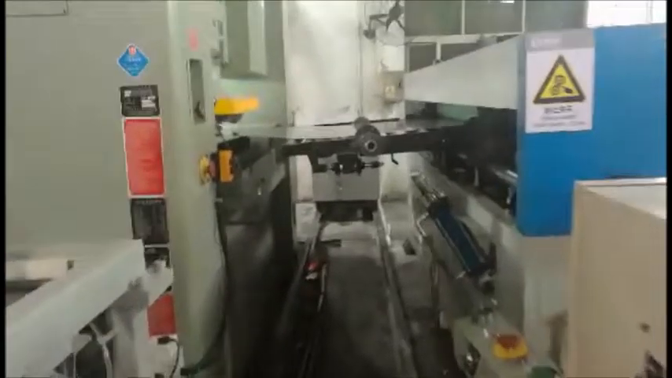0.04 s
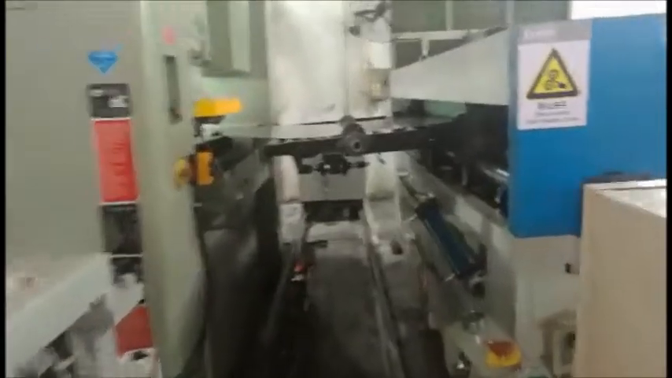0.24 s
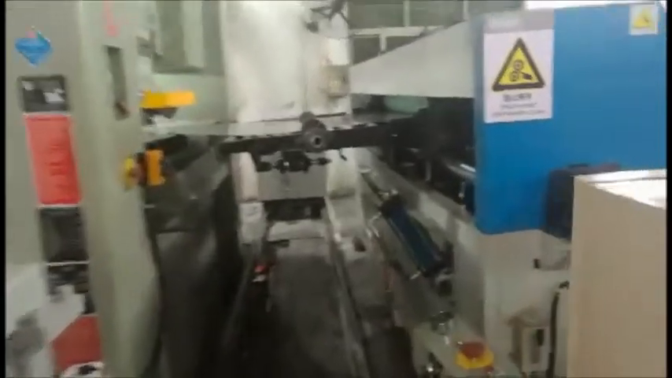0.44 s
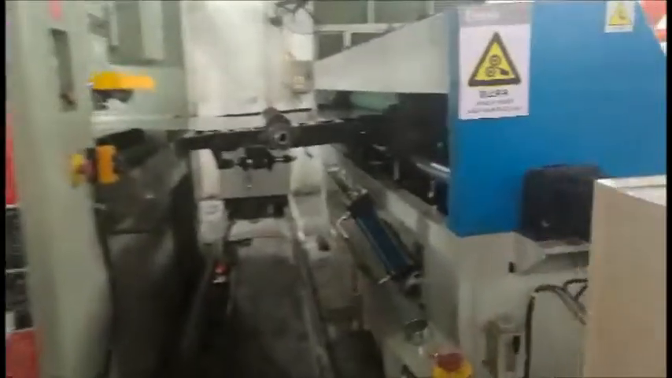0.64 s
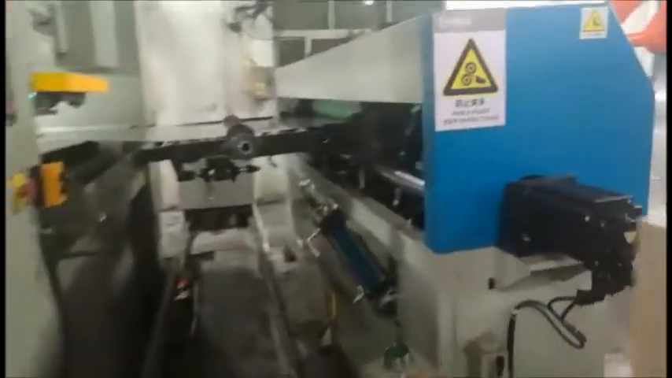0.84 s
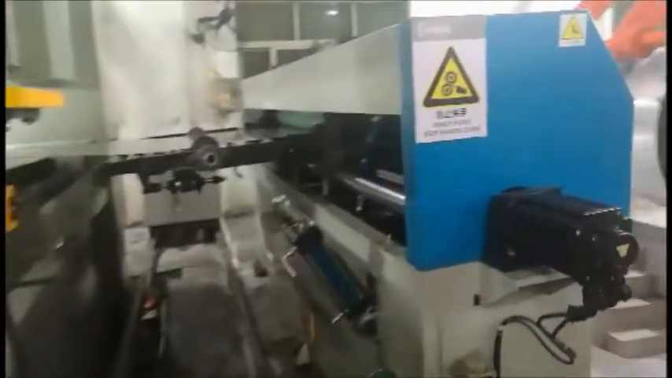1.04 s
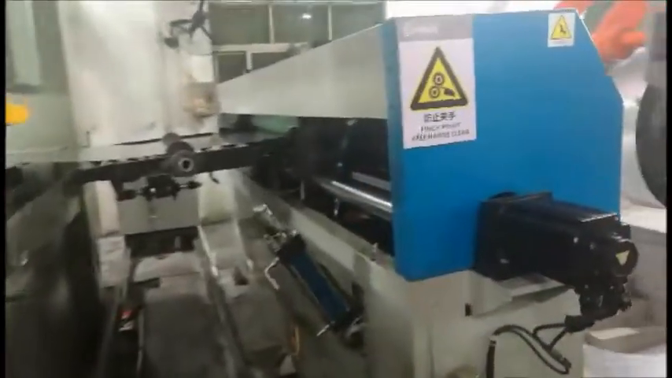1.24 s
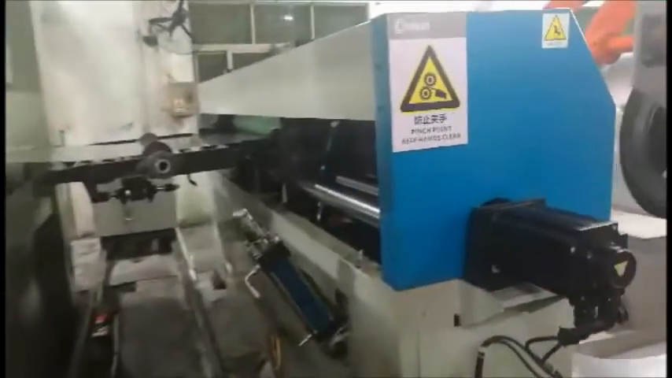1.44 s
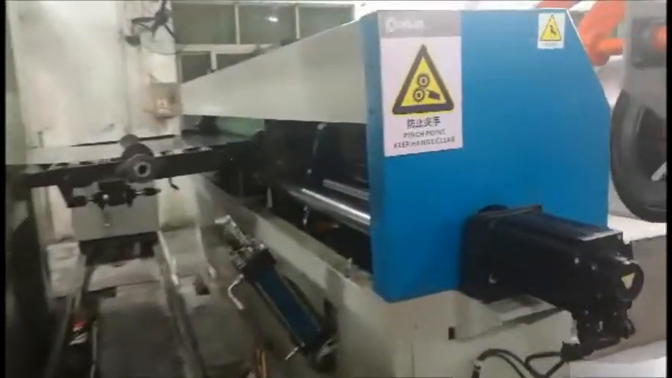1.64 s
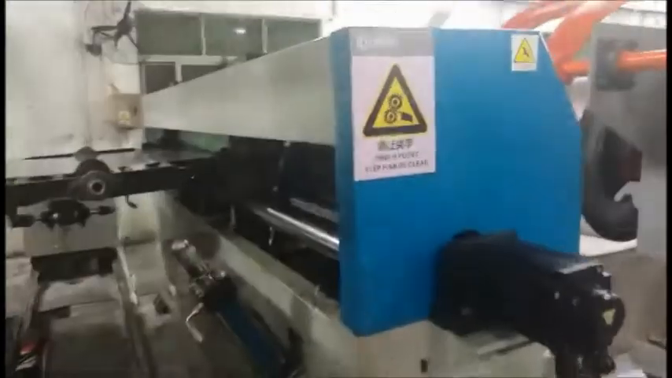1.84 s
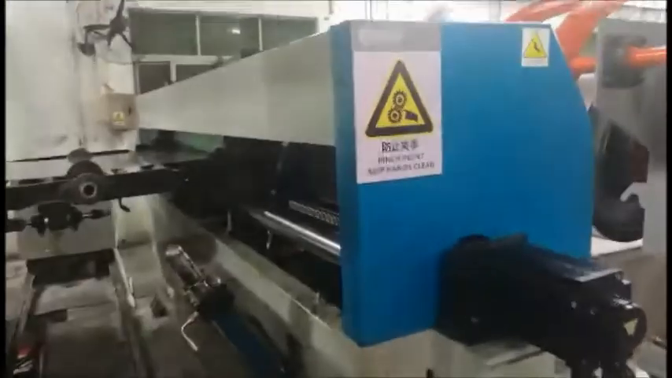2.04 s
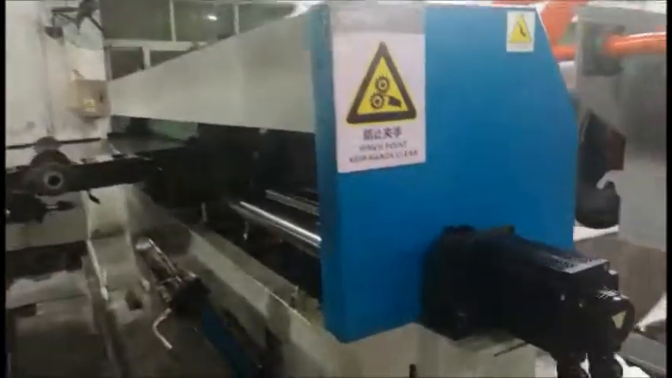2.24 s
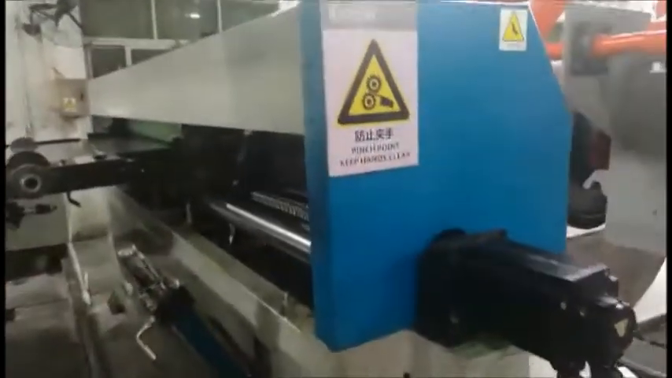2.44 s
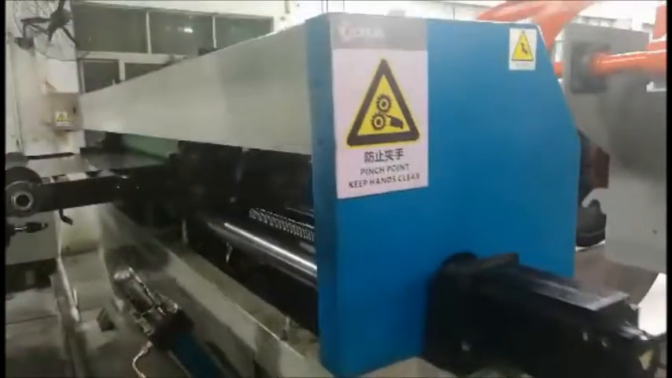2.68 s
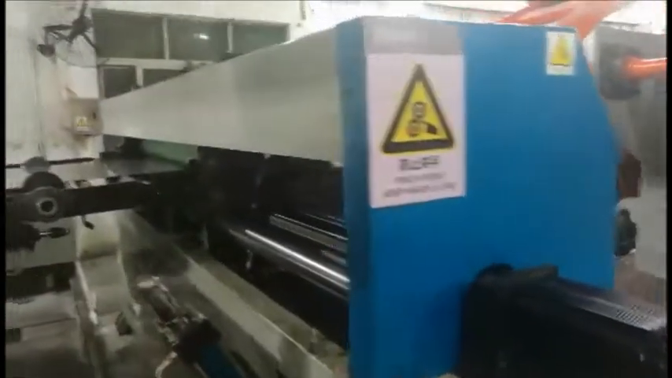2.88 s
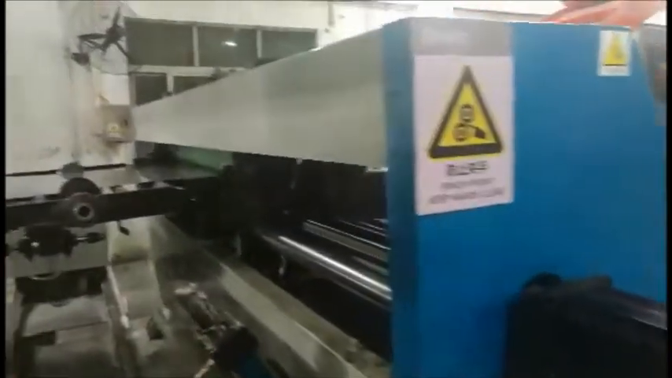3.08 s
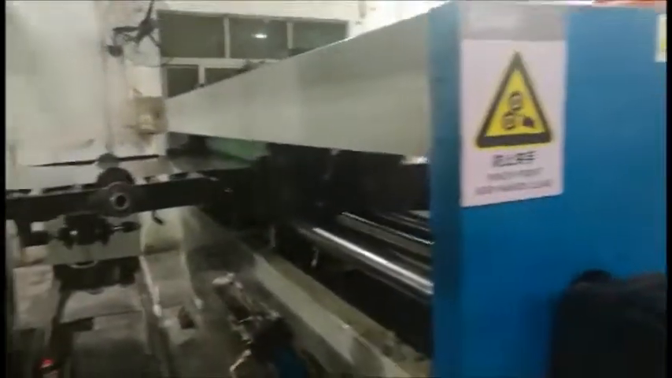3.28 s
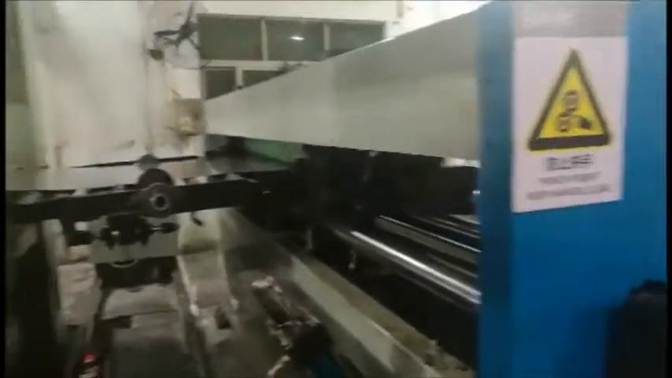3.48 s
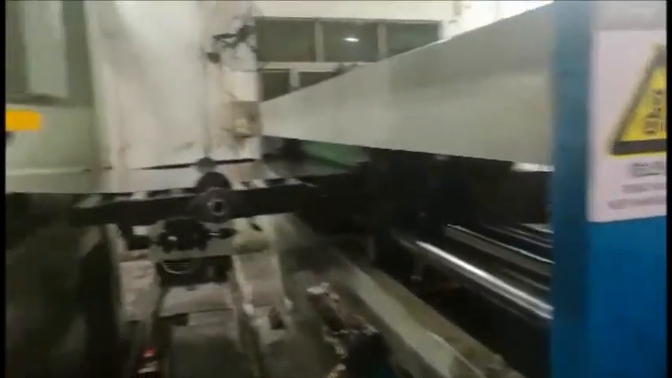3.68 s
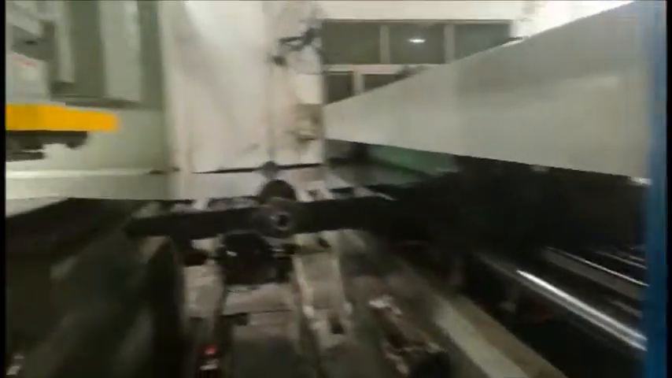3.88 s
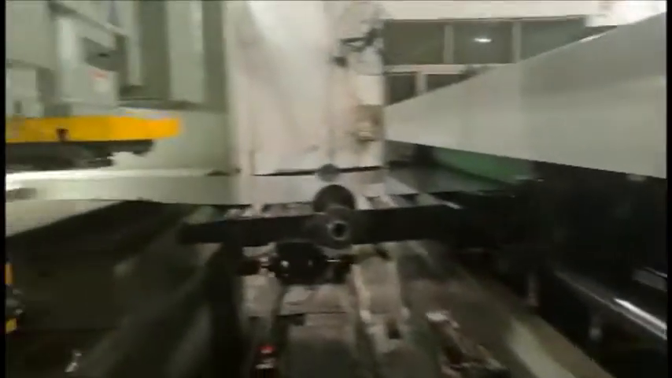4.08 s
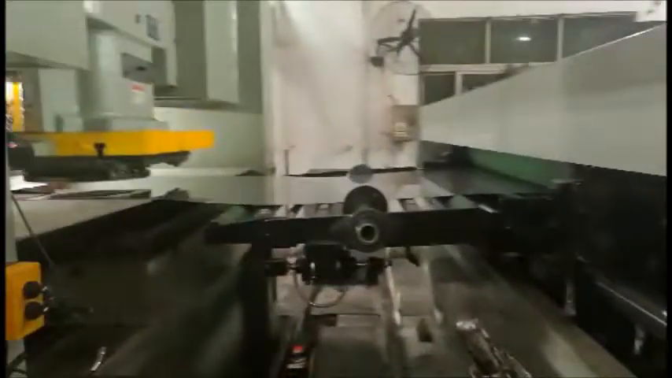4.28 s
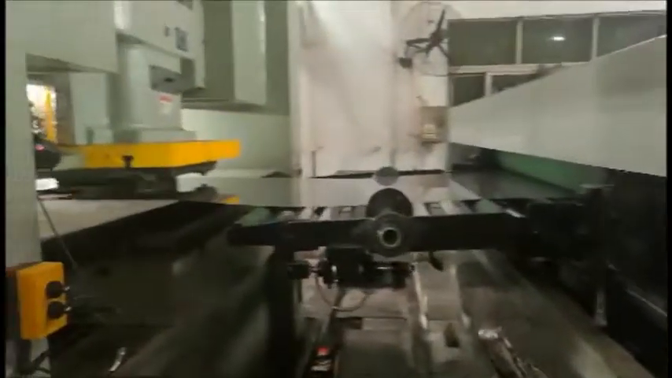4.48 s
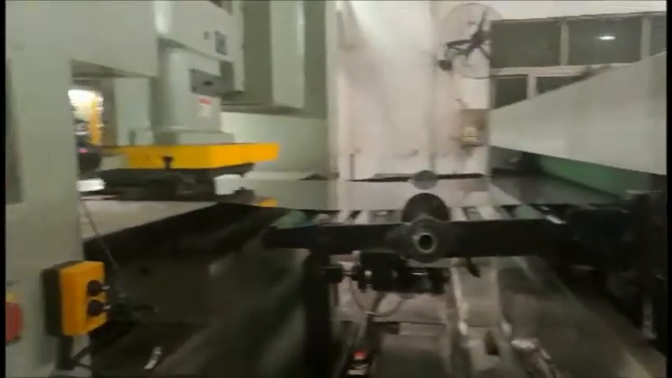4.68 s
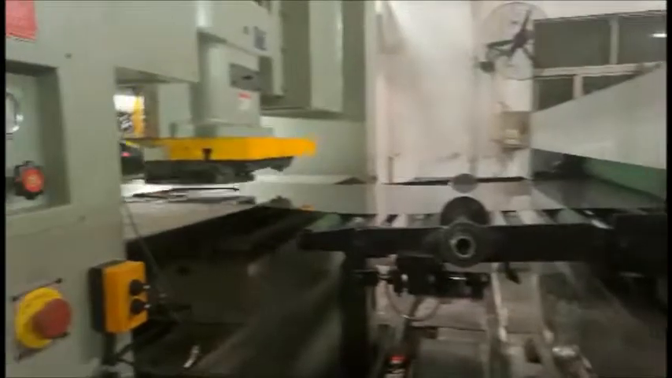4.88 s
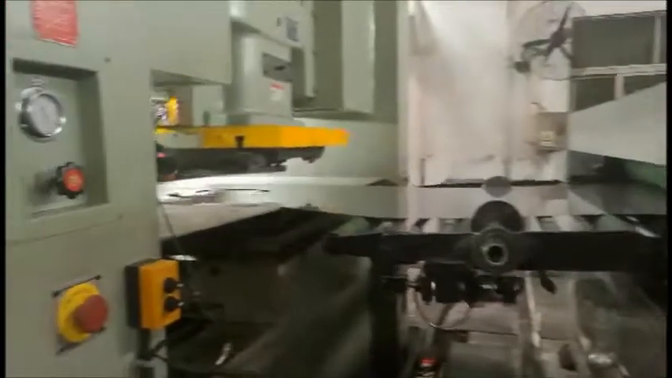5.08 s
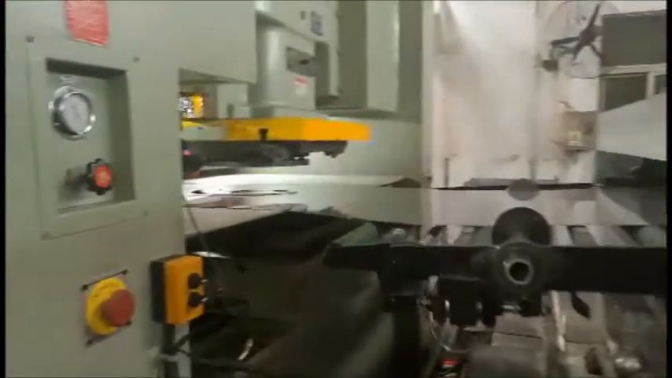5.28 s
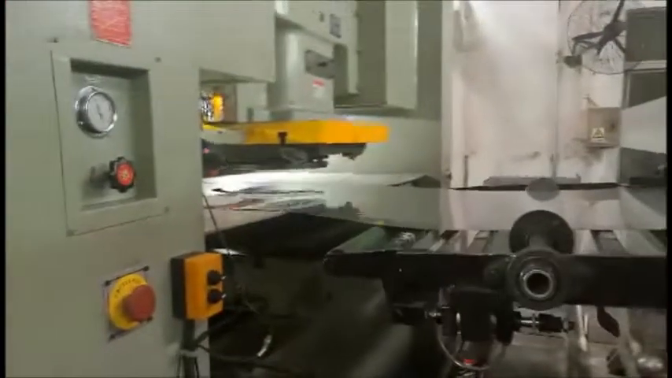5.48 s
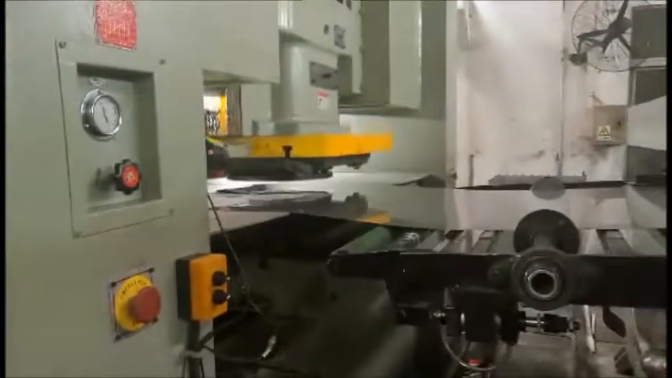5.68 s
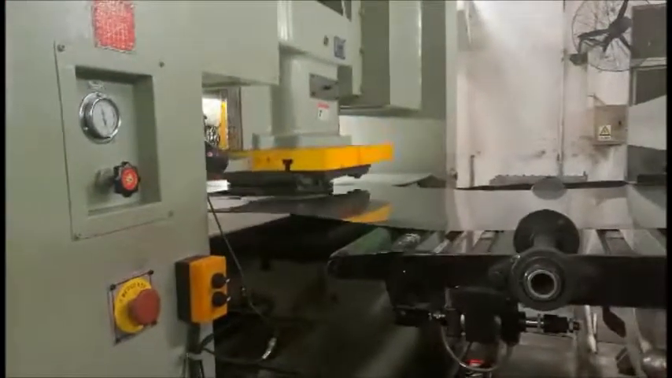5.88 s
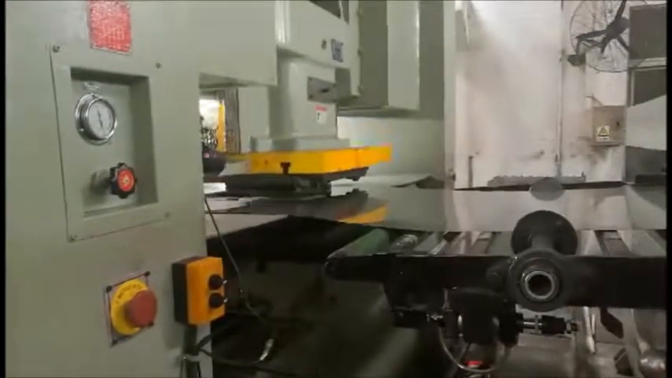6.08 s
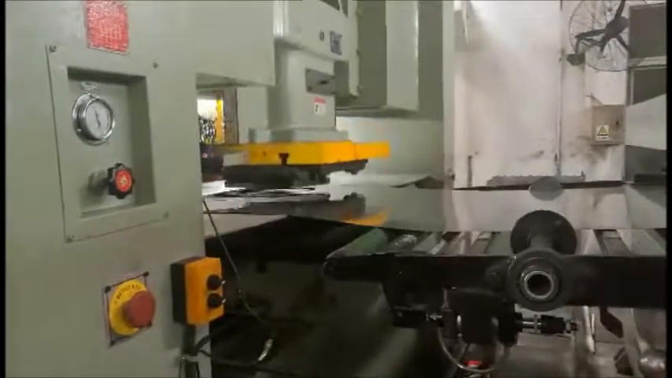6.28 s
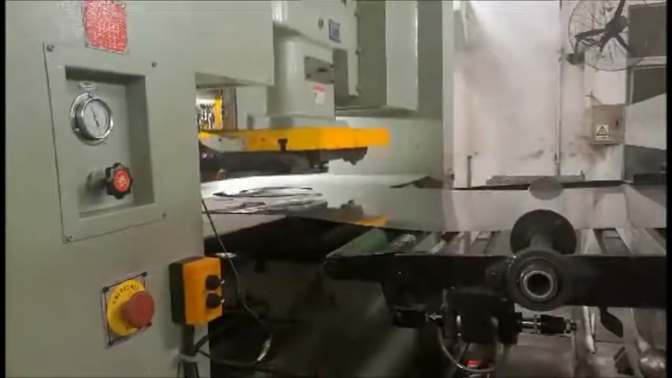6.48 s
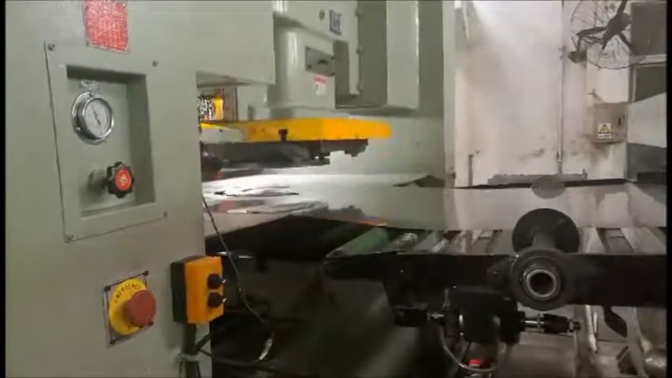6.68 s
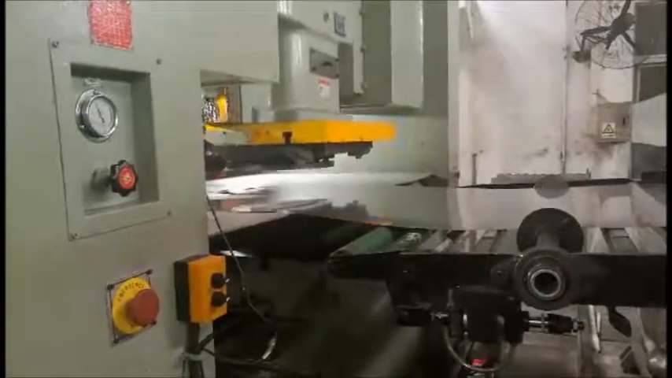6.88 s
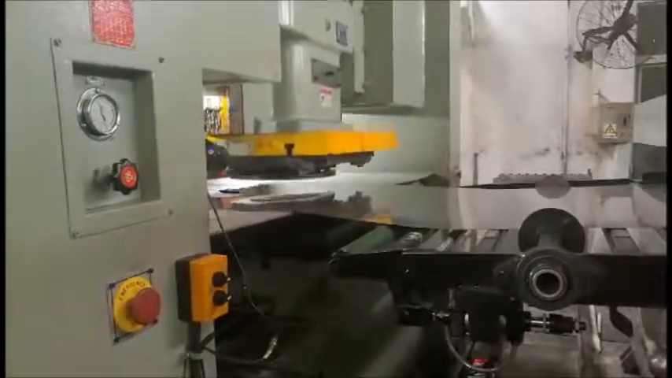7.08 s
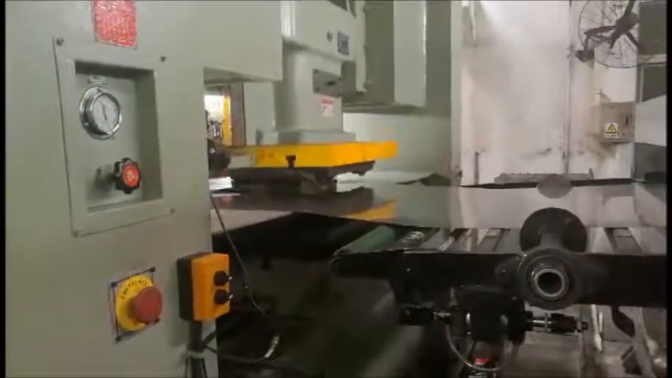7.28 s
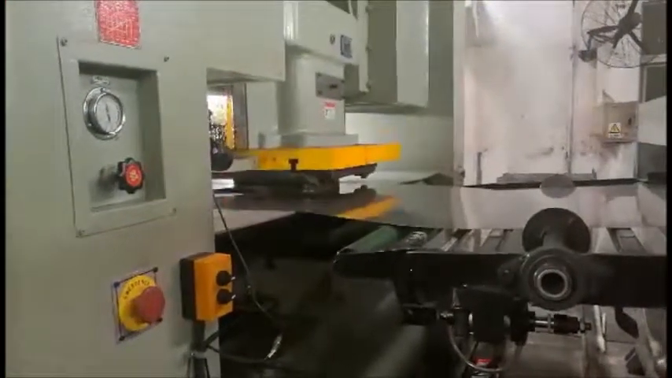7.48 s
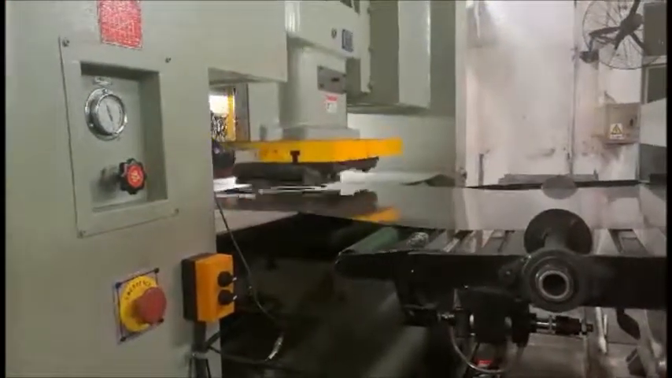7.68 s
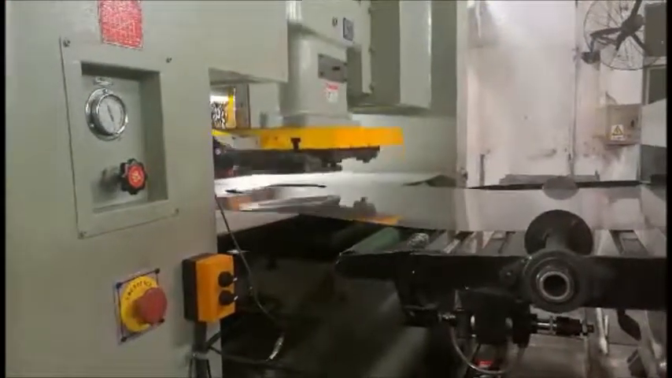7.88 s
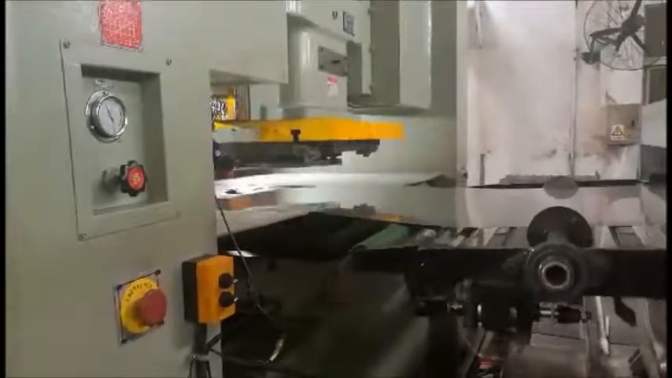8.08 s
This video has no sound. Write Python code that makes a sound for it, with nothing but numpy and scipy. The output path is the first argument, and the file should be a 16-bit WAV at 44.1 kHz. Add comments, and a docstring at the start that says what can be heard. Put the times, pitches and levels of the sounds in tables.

```python
"""A factory hall hums and hisses, something knocks far off and a valve spits air; then a power press strikes.
It punches sheet metal every 1.45 s: each stroke is a gritty clash, low thumps, ringing steel and a hall wash.
Between strokes valves spit, the strip scrapes, rollers tick and the far machine knocks once more.
A low tone follows the first stroke and comes back faintly later.
Noise shaped by frequency makes the rushes, clashes and hall; fading sine waves make the ringing and low tones."""
import sys
import numpy as np
from scipy import signal
from scipy.fft import rfft, irfft
from scipy.io import wavfile
from scipy.ndimage import uniform_filter1d

SR = 44100
rng = np.random.default_rng(int(sys.argv[2]) if len(sys.argv) > 2 else 0)


def output_pcm(signal):
    """Save a mono or channel-first signal as 16-bit PCM at the path in sys.argv[1].

    Samples are clipped to [-1, 1] before scaling.
    """
    pcm = np.clip(np.atleast_2d(signal).T, -1, 1) * 32767
    wavfile.write(sys.argv[1], SR, np.round(pcm).astype(np.int16))


N = 358533

# how alike the two microphones hear a sound: pitch_hz, correlation (-1 to 1)
MIC_LIKENESS = [(60, 0.98), (140, 1), (220, 0.87), (330, 0.84), (520, -0.14), (800, -0.19), (1200, 0.1),
                (3000, -0.0048)]
# first contact of the punch, and one turn of the crank
FIRST_STROKE_S, CYCLE_S = 0.2853, 1.452


def gain_of(db):
    """Turns decibels into a factor for the wave."""
    return 10 ** (np.asarray(db) / 20)


def read(points, hz, axis=1):
    """Reads one column of a table by straight lines over log frequency."""
    table = np.transpose(points)
    return np.interp(np.log(hz + 1), np.log(table[0] + 1), table[axis])


def add(mix, start_s, sound):
    """Mixes a stereo sound in at start_s, cutting off what runs past the end."""
    part = mix[:, max(round(start_s * SR), 0):][:, :sound.shape[1]]
    part += sound[:, :part.shape[1]]


def rise(t, seconds):
    """A smooth step from 0 to 1 that begins at t = 0."""
    return np.sin(np.pi / 2 * np.clip(t / max(seconds, 1e-4), 0, 1)) ** 2


def diffuse(table, count, hold=0, dying=True, ripple_db=0, patchy_db=3.0, size=1024):
    """Uneven stereo noise shaped by a table; if dying, each band fades at its own rate after hold seconds."""
    hz = np.fft.rfftfreq(size, 1 / SR)
    t = np.arange(count * 4 // size + 6)[:, None] * size / 4 / SR  # four overlapping frames per window
    a, b, c, d, patches = rng.standard_normal((5, len(t), len(hz)))
    # the second microphone hears a share of the first one's noise and some of its own
    same = read(MIC_LIKENESS, hz)
    first = a + 1j * b
    second = same * first + np.sqrt(1 - same ** 2) * (c + 1j * d)
    spectrum = np.array([first, second])
    # lasting peaks and dips, then random patches of louder and softer noise that come and go
    ripple = uniform_filter1d(rng.standard_normal((2, 1, len(hz))), size=2) * np.sqrt(2)
    patches = uniform_filter1d(uniform_filter1d(patches, size=8, axis=0), size=3, axis=1)
    unevenness_db = ripple_db * ripple + patchy_db * patches / patches.std()
    level_db = read(table, hz) + unevenness_db * hz / (hz + 500)  # the bass stays more even
    if dying:
        level_db = level_db - 60 * np.maximum(t - hold, 0) / read(table, hz, axis=2)
    spectrum *= gain_of(level_db) * np.sqrt(1.5 * SR / size)
    return signal.istft(spectrum.transpose(0, 2, 1), nperseg=size, noverlap=size * 3 // 4)[1][:, :count]


def gritty(sound, depth_db, size):
    """Breaks a sound into grains of about size samples by shaking its level."""
    grain = uniform_filter1d(rng.standard_normal(sound.shape[1]), size) * np.sqrt(size)
    gain = gain_of(depth_db * np.clip(grain, -2, 2))
    return sound * gain / np.sqrt(np.mean(gain ** 2))


def brighten(sound, db, corner_hz):
    """Gradually raises or lowers everything above a corner."""
    hz = np.fft.rfftfreq(sound.shape[1], 1 / SR)
    shelf = gain_of(db * hz ** 2 / (hz ** 2 + corner_hz ** 2))
    return irfft(rfft(sound) * shelf, sound.shape[1])


def burst(table, attack, hold, ripple_db=2):
    """A half-second rush that swells while its bands wait for hold seconds and then fade."""
    swell = rise(np.arange(SR // 2) / SR, attack)
    return diffuse(table, SR // 2, hold, ripple_db=ripple_db, size=512) * swell


def background():
    """The din of motors and fans, and leaking air whose hiss swells twice in every turn of the crank."""
    # motors and fans: pitch_hz, level_db per Hz
    din_bands = [(20, -97), (44, -73.5), (60, -87), (85, -68.5), (105, -77.5), (150, -71.5), (300, -68.5),
                 (480, -75.5), (800, -72), (1300, -79), (2200, -78.5), (3500, -81.5), (5000, -85.5),
                 (8000, -98.5)]
    # leaking air, before its swells: pitch_hz, relative_db per Hz
    leak_bands = [(2000, -105), (5000, -87.5), (7000, -91), (11500, -89.5), (14500, -91.5)]
    # swells of the leak in each turn: after_contact_s, change_db
    leak_cycle = [(.02, 5.5), (.36, 2.5), (.63, 0), (.84, 3), (1.17, -0.6)]
    # slow drift of the leak: time_s, change_db
    leak_drift = [(0, 0.5), (2.7, -1.5), (3.9, 1.7), (5.3, 1.5), (6.4, 0), (8.1, -0.5)]
    t = np.arange(N) / SR
    leak_db = np.interp(t - FIRST_STROKE_S, *np.transpose(leak_cycle), period=CYCLE_S)
    leak_db += np.interp(t, *np.transpose(leak_drift))
    din = diffuse(din_bands, N, dying=False, ripple_db=0.0, patchy_db=2.5, size=4096)
    din = gritty(din, depth_db=0.2, size=2500)
    return din + gain_of(leak_db) * diffuse(leak_bands, N, dying=False)


def neighbour():
    """A machine across the hall: blunt, mostly low bursts of noise that swell and fade."""
    # its knocks: start_s, level_db, swell_s
    knocks = [(.022, 2, 0.045), (4.37, 4.5, 0.034)]
    # sound of a knock: pitch_hz, relative_db per Hz, time to fade by 60 dB in s
    far_bands = [(22, -78, .7), (50, -67, .7), (150, -62, 0.93), (500, -65.5, 1), (935, -62.5, 0.78),
                 (1550, -69.5, 0.58), (4000, -79.5, 0.95), (7000, -88, 0.3), (14000, -91, 0.27)]
    out = np.zeros((2, N))
    for start_s, level_db, swell_s in knocks:
        add(out, start_s, gain_of(level_db) * burst(far_bands, attack=swell_s, hold=0.045))
    return out


def valves():
    """Compressed air rushes out as a short hiss with a thin whistle on top, and the hall washes it out."""
    # puffs of air: start_s, level_db, treble_db, whistle_db
    spits = [(0.193, 2, 0.5, -14), (0.456, 6, -0.5, -12), (1.911, -6, 2.5, -20), (2.144, 1, -4, -7),
             (3.056, -7, -3.5, -15), (4.282, -5.5, 2, -10), (4.376, -5.5, -8, -15), (4.560, 0.5, -4.5, -4),
             (5.911, -6, 5.5, -6), (7.317, -7, 6.5, -22)]
    # rushing air: pitch_hz, relative_db per Hz, time to fade by 60 dB in s
    jet_bands = [(200, -83, .4), (1500, -73, 1), (3000, -73, 0.57), (4600, -68.5, 0.34),
                 (5740, -69.5, 0.29), (7650, -75.5, 0.37), (11100, -68.5, 0.29), (14500, -75, 0.24)]
    # thin top whistle: pitch_hz, relative_db per Hz, time to fade by 60 dB in s
    whistle_bands = [(11500, -105, .1), (12800, -62, .12), (13600, -58, 0.13), (15000, -71, .12)]
    hold_at_0_db_s, stretch = 0.013, 0.72  # stretch: dB of time gained per dB of level lost
    wash_db, wash_decay_s = -16, 0.19
    out, t = np.zeros((2, N)), np.arange(SR) / SR
    for start_s, level_db, treble_db, whistle_db in spits:
        # a valve that opens less hisses for longer
        hold = hold_at_0_db_s * gain_of(-stretch * level_db)
        jet = brighten(burst(jet_bands, 0.008, hold, ripple_db=4.5), treble_db, corner_hz=7000)
        whistle = gain_of(whistle_db) * burst(whistle_bands, attack=0.011, hold=hold)
        wash = diffuse(jet_bands, SR, dying=False) * rise(t, 0.033) * np.exp(-t / wash_decay_s)
        add(out, start_s, gain_of(level_db) * (jet + whistle))
        add(out, start_s, gain_of(level_db + wash_db) * wash)
    return out


def clash(lead):
    """The stages of one cut, each a gritty burst of steel on steel; contact comes lead seconds in."""
    # stripper clamps, punch lands, sheet cracks, punch snaps through:
    # after_contact_s, relative_db, treble_db, treble_corner_hz, attack_s
    stages = [(-.018, -5.5, -12.5, 1000, 0.014), (-.002, -3.5, 0, 8000, 0.0053),
              (.006, -3, -1, 7000, 0.0043), (.028, -2.2, -10.5, 2500, 0.0039)]
    # dense ring of die and sheet: pitch_hz, relative_db per Hz, time to fade by 60 dB in s
    clash_bands = [(25, -69, .4), (60, -52, 0.18), (105, -54, 0.17), (170, -41.5, 0.17), (452, -51, 0.67),
                   (910, -40.5, 0.25), (1480, -49, 0.48), (2840, -56, 0.34), (3700, -53.5, 0.2),
                   (6800, -67, 0.54), (12100, -65, 0.55), (14300, -67, 0.21)]
    out, t = np.zeros((2, SR // 2)), np.arange(SR // 2) / SR
    for after_s, level_db, treble_db, corner_hz, attack in stages:
        steel = diffuse(clash_bands, len(t), ripple_db=3.0, size=512)
        steel = gritty(steel, depth_db=1.5, size=70)
        steel = brighten(steel, treble_db, corner_hz) * rise(t, attack)
        add(out, lead + after_s, gain_of(level_db) * steel)
    return out


def ring(t, attack, split=0.01334, twin=0.71):
    """The modes of frame and die; each has a weaker twin close by, so that it beats as it dies."""
    # frame (low) and die (high): pitch_hz, relative_db, time to fade by 60 dB in s
    modes = [(55, -31, .9), (66, -36, 1.6), (97, -41, 1.5), (118, -26, .45), (135, -22.5, .45),
             (154, -28, 2.6), (173, -16, .35), (182, -24, 1.9), (221, -31, 1.8), (248, -24.5, 2.0),
             (283, -29, 1.3), (316, -20.5, 1.3), (345, -32, 1.6), (364, -24, 1.1), (394, -26, 1.4),
             (503, -30, 1.3), (560, -35, 1.8), (619, -24.5, .55), (834, -27, .7), (978, -20, .55),
             (1079, -30, .8), (1259, -27, .7), (1482, -28, .6), (1996, -32, .8), (3140, -42, 1.0),
             (4635, -35, .75), (5459, -44, 1.2), (6330, -47, 1.2), (7289, -47, 1.1), (8520, -41, .4)]
    out = np.zeros((2, len(t)))
    draws = rng.uniform(-1.057, 1, (len(modes), 4))
    for (hz, level_db, t60), (turn, beat_turn, side, gap) in zip(modes, draws):
        # a lag between the microphones gives the likeness wanted at this pitch
        lag = np.arccos(read(MIC_LIKENESS, hz)) * np.sign(side)
        beat_hz = np.sign(gap) * 4 + gap * split * min(hz, 3000)
        fade = gain_of(level_db) * np.exp(-np.log(1000) * t / t60)
        fade *= rise(t, attack + 1.4 / hz)  # heavy modes start slowly
        beating = 1 + twin * np.exp(2j * np.pi * (beat_hz * t + beat_turn))
        wave = np.exp(2j * np.pi * (hz * t + turn)) * beating
        out += (np.exp(1j * np.array([[0], [lag]])) * wave).real * fade
    return out


def hall(t):
    """The hall returns a long wash of noise whose bands die at their own rates."""
    # answer to a stroke: pitch_hz, relative_db per Hz, time to fade by 60 dB in s
    hall_bands = [(25.1, -75, 2), (60.5, -58, 2.5), (110, -53, 2.1), (171, -53.5, 3), (337, -48.5, 3.7),
                  (408, -55, 3.77), (890, -53.5, 3.05), (1360, -59, 3.22), (1990, -63.5, 3.14),
                  (3120, -67, 2), (5000, -67.5, 1.38), (7000, -77, 1.85), (13000, -71.5, 0.87)]
    return diffuse(hall_bands, len(t), ripple_db=5.0, size=2048) * rise(t, 0.061)


def thump(hz, width):
    """One heavy low push, a few waves under a bell shape, the same at both microphones."""
    t = np.arange(-SR // 20, SR // 20) / SR
    return np.tile(np.cos(2 * np.pi * hz * t) * np.exp(-(t / width) ** 2), (2, 1))


def repeated(usual, fresh):
    """A machine repeats itself: the bass is nearly the same every stroke, the treble mostly new."""
    # likeness to the usual stroke: pitch_hz, correlation (0 to 1)
    repeats = [(100, .98), (300, .97), (900, .92), (2500, .7), (6000, .4), (14000, .2)]
    same = read(repeats, np.fft.rfftfreq(usual.shape[1], 1 / SR))
    return irfft(same * rfft(usual) + np.sqrt(1 - same ** 2) * rfft(fresh), usual.shape[1])


def press():
    """The punch clashes through the sheet, the strained frame springs back and rings, the hall answers."""
    # one row a stroke: strength_db of the cut, openness of the die to the microphones (0 to 1), hall_db
    strokes = [(-4, 0.73, -2), (0, 0.24, .5), (-0.5, 0.54, -2), (.5, 1, -2), (1.5, 0.87, .5), (1.3, 1, -2)]
    # the released frame kicks the floor and rebounds: after_contact_s, pitch_hz, relative_db, half_width_s
    thumps = [(0.037, 68, -23, 0.014), (0.071, 67, -28, 0.01)]
    # screened by the feeder the frame's hum and the bite lead, in the open the die's clash does;
    # each pair: screened_db, open_db
    cut_pair, bite_pair, treble_pair = (-6, -0.24), (12.5, -0.9), (-3.5, 2.5)
    thump_pair, ring_pair, upper_modes_pair = (3, -2), (2, -4), (-8, 3.5)
    # a harder cut is brighter and kicks the floor harder (dB per dB of strength)
    treble_per_db, thump_per_db = 0.6, 3.5
    out, t = np.zeros((2, N)), np.arange(2 * SR) / SR
    lead = 0.03  # s of clash before contact
    usual_clash, usual_hall, modes = clash(lead), hall(t), ring(t, attack=0.012)
    pairs = [cut_pair, bite_pair, treble_pair, thump_pair, ring_pair, upper_modes_pair]
    screened, in_the_open = np.transpose(pairs)
    for turn, (strength_db, openness, hall_db) in enumerate(strokes):
        contact_s = FIRST_STROKE_S + turn * CYCLE_S
        levels_db = screened + openness * (in_the_open - screened)
        cut_db, bite_db, treble_db, thump_db, ring_db, upper_db = levels_db
        cut = brighten(repeated(usual_clash, clash(lead)), bite_db, corner_hz=1210)
        # the top takes back half of the bite's change
        top_db = treble_db + treble_per_db * strength_db - bite_db / 2
        cut = brighten(cut, top_db, corner_hz=4500)
        add(out, contact_s - lead, gain_of(cut_db + strength_db) * cut)
        add(out, contact_s + 0.00198, gain_of(ring_db) * brighten(modes, upper_db, corner_hz=280))
        add(out, contact_s + 0.01, gain_of(hall_db) * repeated(usual_hall, hall(t)))
        kick_db = thump_db + thump_per_db * strength_db
        for after_s, hz, level_db, width in thumps:
            # each thump peaks 1/20 s into its own sound
            add(out, contact_s + after_s - 1 / 20, gain_of(kick_db + level_db) * thump(hz, width))
    return out


def low_ring(swell=0.047):
    """A low tone, one sine wave, swells briefly and fades, once after the first stroke and once later."""
    # tones: start_s, pitch_hz, level_db, time to fade by 60 dB in s
    low_tones = [(.345, 319.7, -11.5, 0.49), (2.132, 344, -29.5, 0.89)]
    out, t = np.zeros((2, N)), np.arange(SR) / SR
    for start_s, hz, level_db, t60 in low_tones:
        tone = np.sin(2 * np.pi * hz * t) * np.exp(-np.log(1000) * t / t60) * rise(t, swell)
        add(out, start_s, gain_of(level_db) * np.tile(tone, (2, 1)))
    return out


def feeder():
    """The strip scrapes over its guides as grainy noise, and the rollers tick in short bright bursts."""
    # scrapes: start_s, level_db, swell_s
    scrapes = [(0.951, -11.5, 0.054), (1.025, -6.5, 0.038), (2.299, -10, 0.029), (3.33, -6.5, 0.035),
               (3.765, -6, 0.032), (3.81, -3.5, 0.03), (5.175, -6, 0.029), (5.225, -7, 0.015),
               (5.37, -11.5, 0.015), (6.638, -8, 0.017)]
    # sliding strip: pitch_hz, relative_db per Hz, time to fade by 60 dB in s
    strip_bands = [(150, -67, 0.2), (900, -67, 0.19), (2200, -64.5, 0.7), (3300, -66, 0.61),
                   (4970, -65, 0.51), (6760, -72.5, 0.54), (11700, -73, 0.7), (14500, -75, 0.43)]
    # roller ticks: start_s, level_db
    ticks = [(1.318, -4), (1.472, -7), (1.485, -7), (1.672, -2)]
    # ring of a tick: pitch_hz, relative_db per Hz, time to fade by 60 dB in s
    tick_bands = [(1500, -95, .05), (2500, -66, 0.045), (3200, -68, 0.055), (4200, -86, .05),
                  (8000, -100, .05)]
    out = np.zeros((2, N))
    for start_s, level_db, swell_s in scrapes:
        slide = burst(strip_bands, attack=swell_s, hold=swell_s, ripple_db=2.5)
        add(out, start_s, gain_of(level_db) * gritty(slide, depth_db=1.0, size=120))
    for start_s, level_db in ticks:
        add(out, start_s, gain_of(level_db) * burst(tick_bands, attack=0.003, hold=0.006))
    return out


def scene():
    """Everything that sounds at the side of the press."""
    return background() + neighbour() + valves() + press() + low_ring() + feeder()


def record(dry):
    """Two microphones of slightly different colour, a soft knee on the highest peaks, then the band limit."""
    # microphone balance: pitch_hz, left_over_right_db
    balance = [(100, -0.5), (270, 0.7), (520, -0.2), (1000, 0.8), (2000, 2.5), (4000, 1), (8000, 0.5),
               (12000, -0.5)]
    edge_hz = 14330  # top of the band
    tilt_db = read(balance, np.fft.rfftfreq(N, 1 / SR)) / 2
    coloured = irfft(rfft(dry) * gain_of([tilt_db, -tilt_db]), N)
    rounded = coloured / (1 + (coloured / 0.9) ** 6) ** (1 / 6)
    edge = signal.firwin(511, edge_hz, window=("kaiser", 9), fs=SR)
    return signal.oaconvolve(rounded, edge[None], "same", axes=1)


dry = scene()
out = record(dry)
output_pcm(out)
```